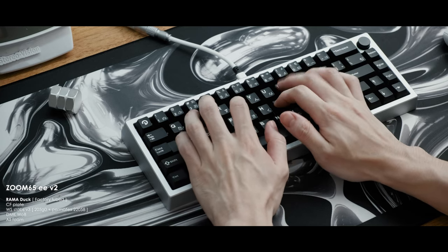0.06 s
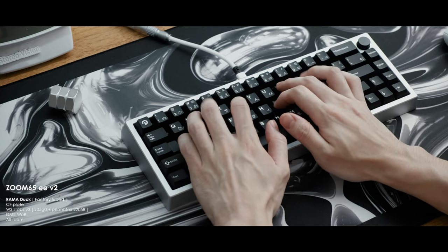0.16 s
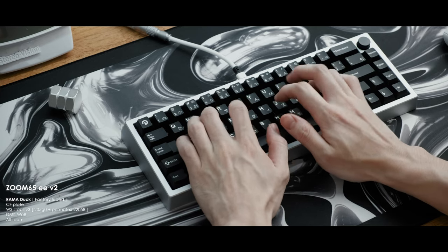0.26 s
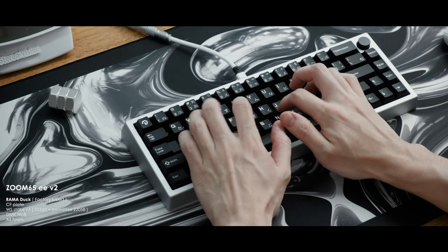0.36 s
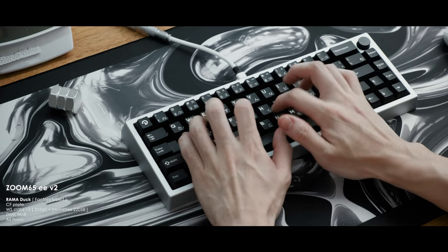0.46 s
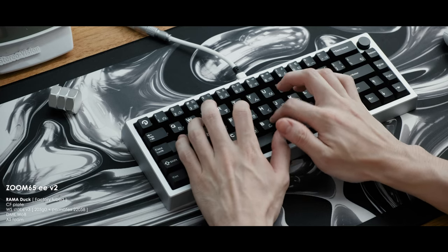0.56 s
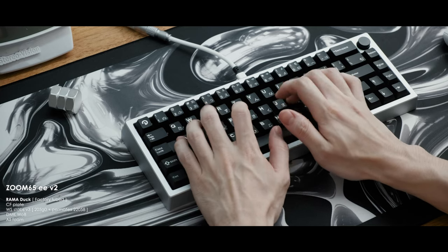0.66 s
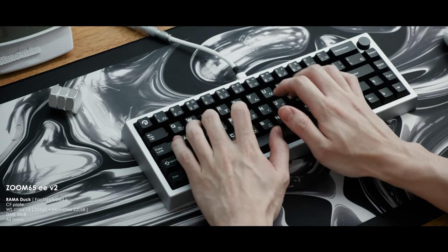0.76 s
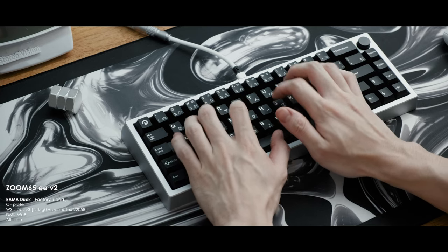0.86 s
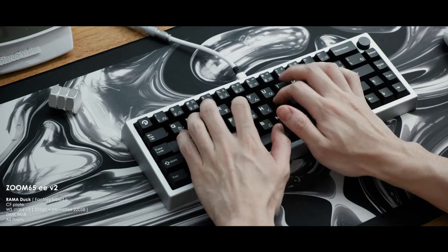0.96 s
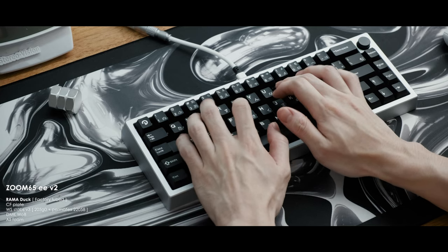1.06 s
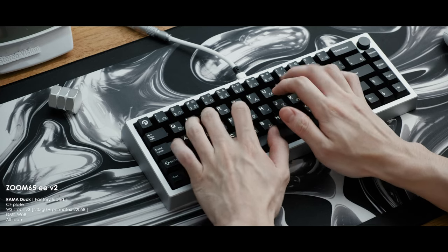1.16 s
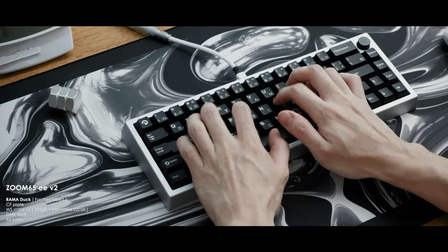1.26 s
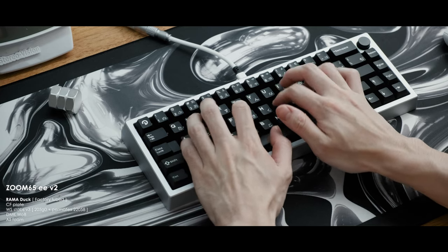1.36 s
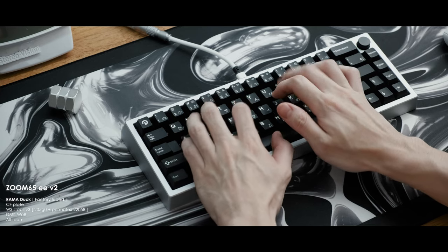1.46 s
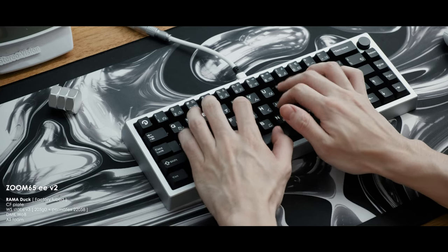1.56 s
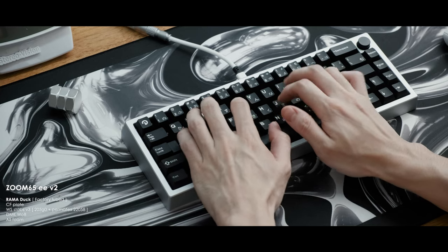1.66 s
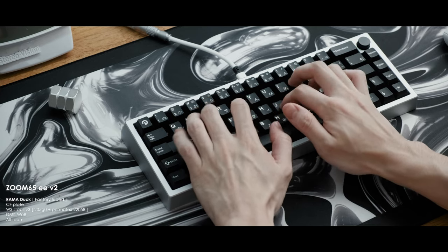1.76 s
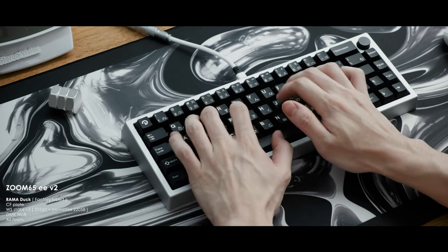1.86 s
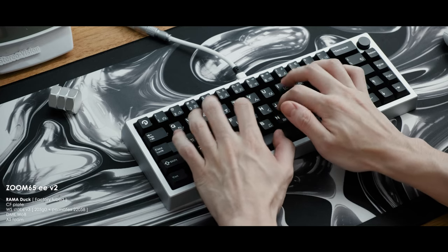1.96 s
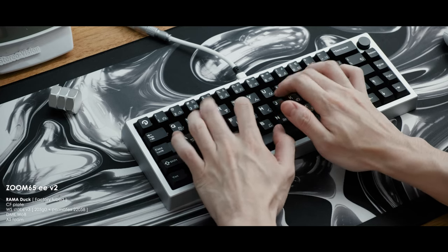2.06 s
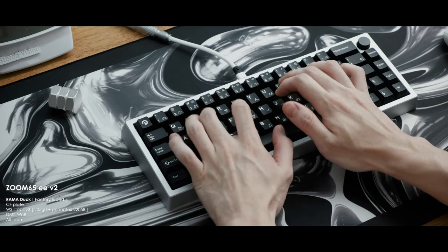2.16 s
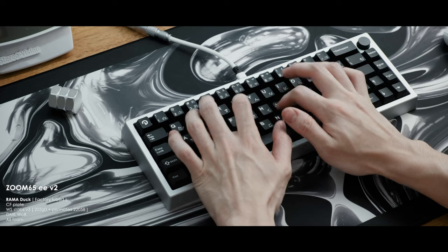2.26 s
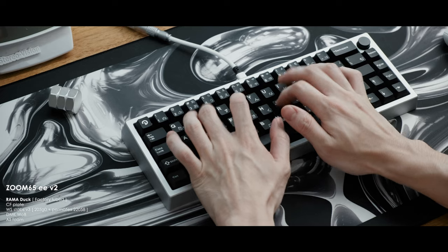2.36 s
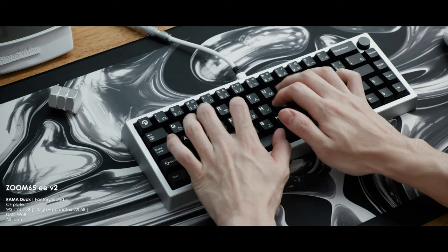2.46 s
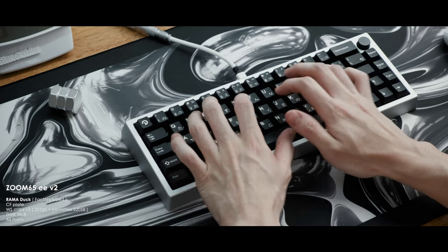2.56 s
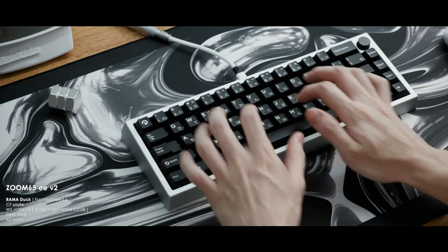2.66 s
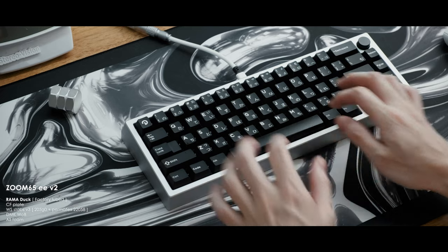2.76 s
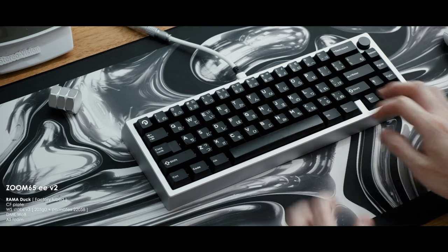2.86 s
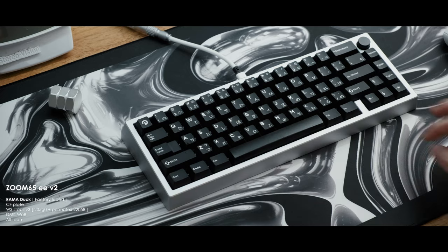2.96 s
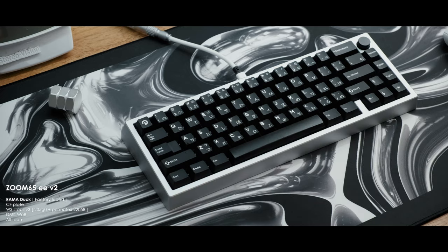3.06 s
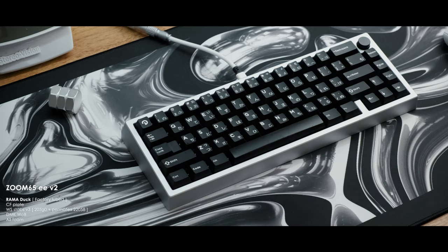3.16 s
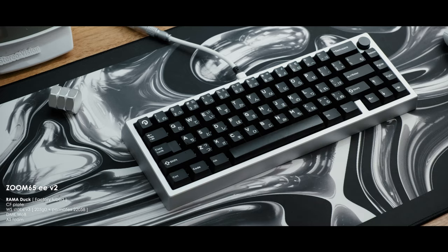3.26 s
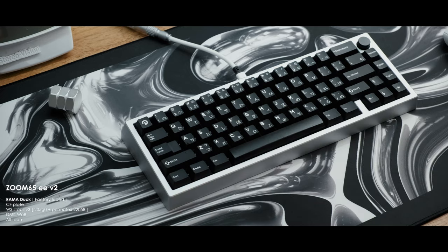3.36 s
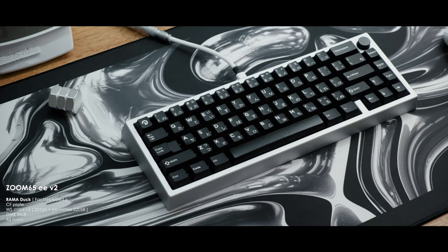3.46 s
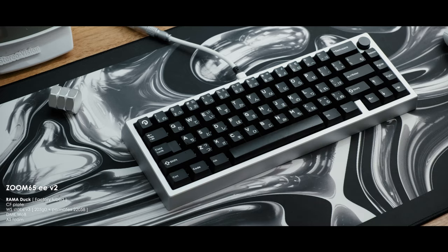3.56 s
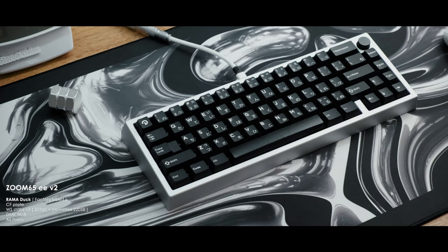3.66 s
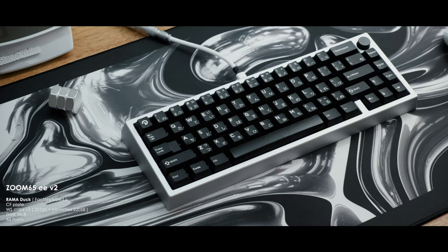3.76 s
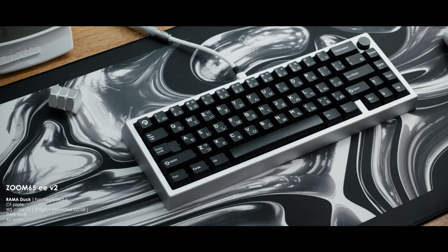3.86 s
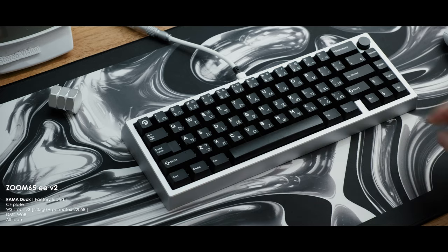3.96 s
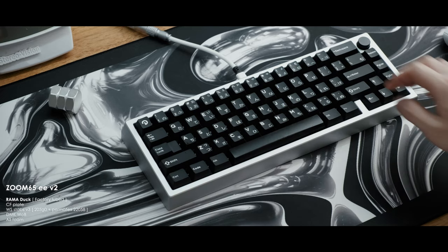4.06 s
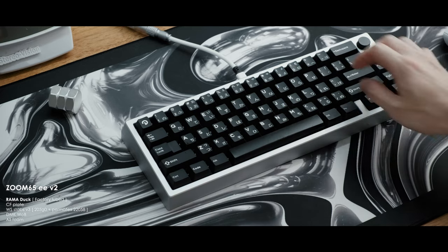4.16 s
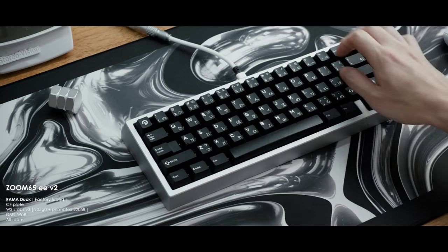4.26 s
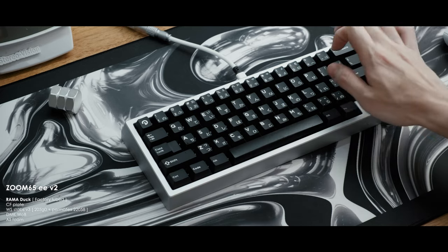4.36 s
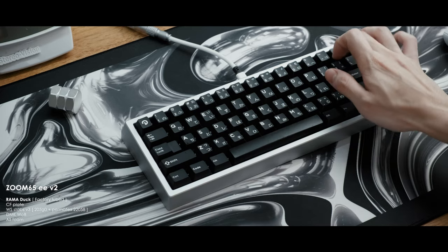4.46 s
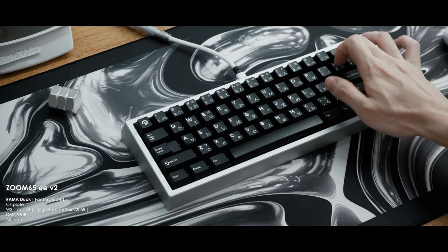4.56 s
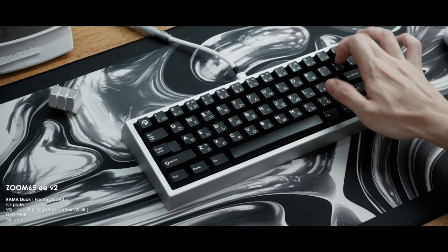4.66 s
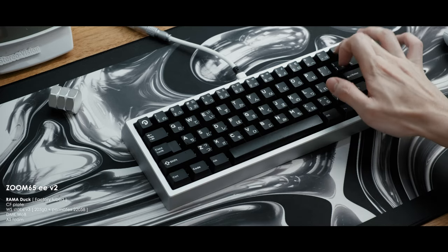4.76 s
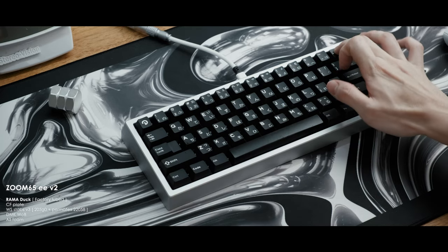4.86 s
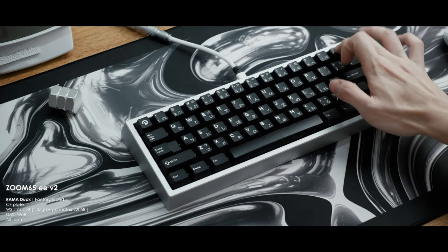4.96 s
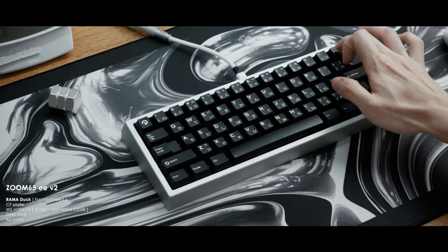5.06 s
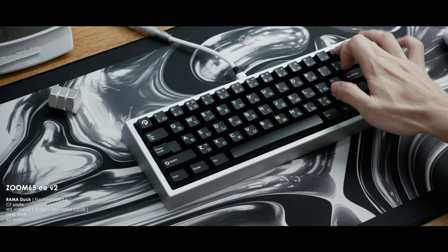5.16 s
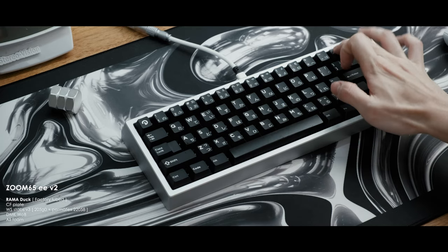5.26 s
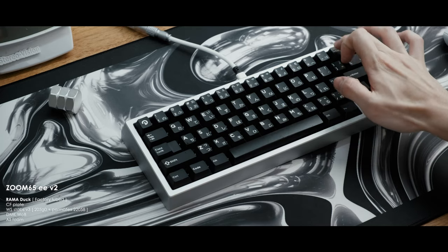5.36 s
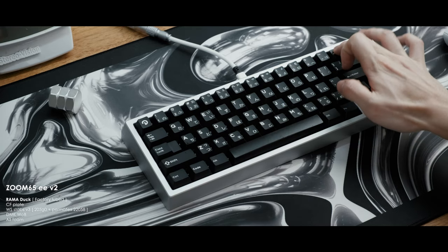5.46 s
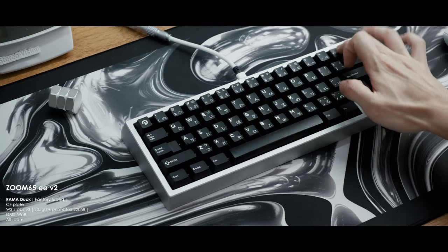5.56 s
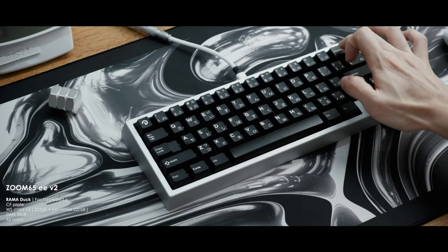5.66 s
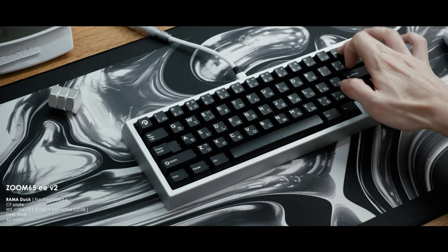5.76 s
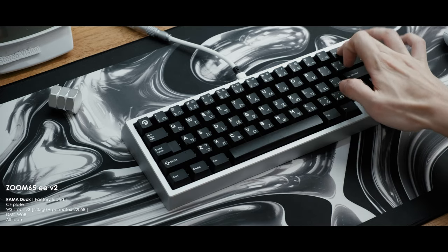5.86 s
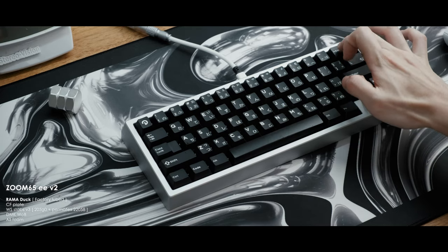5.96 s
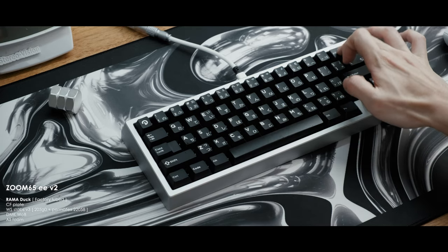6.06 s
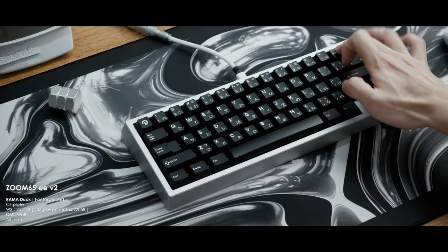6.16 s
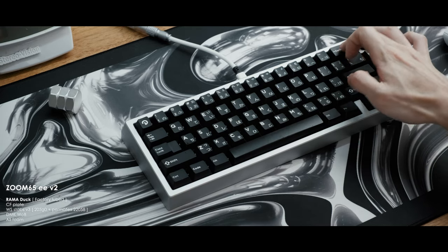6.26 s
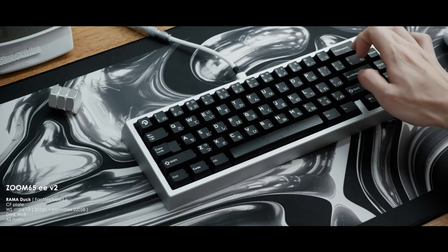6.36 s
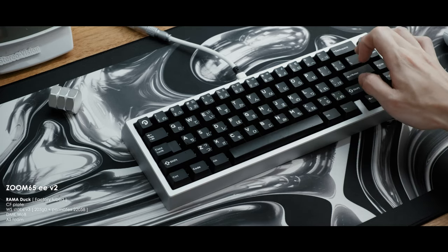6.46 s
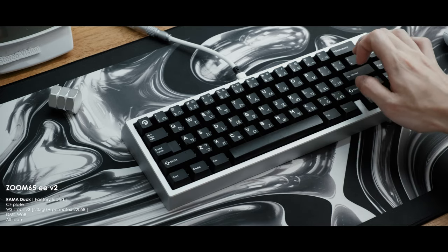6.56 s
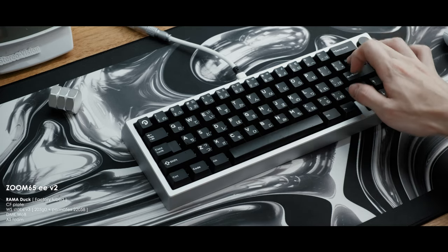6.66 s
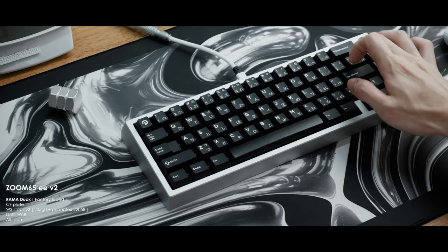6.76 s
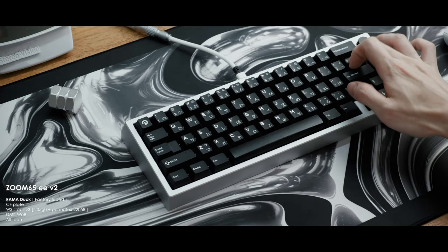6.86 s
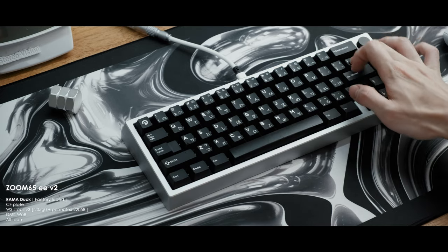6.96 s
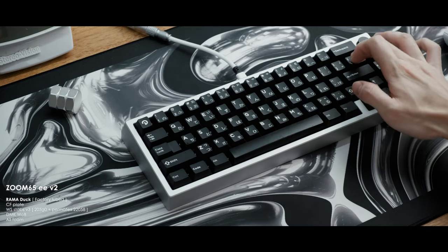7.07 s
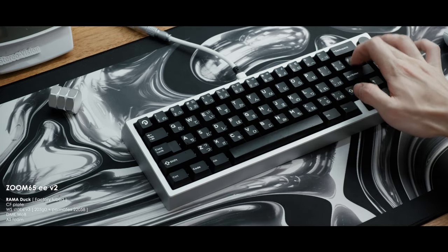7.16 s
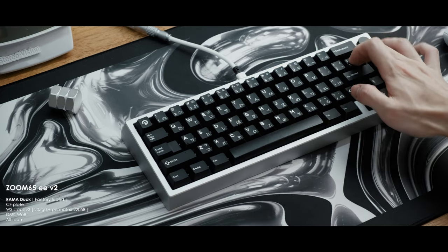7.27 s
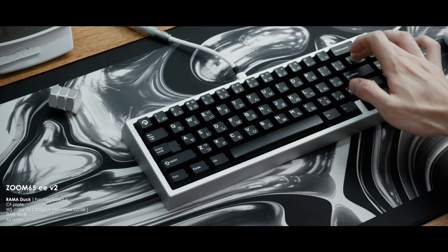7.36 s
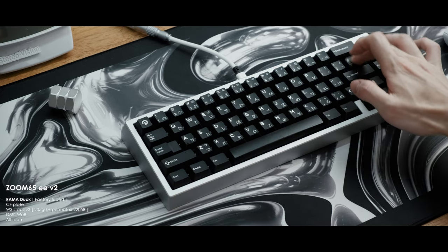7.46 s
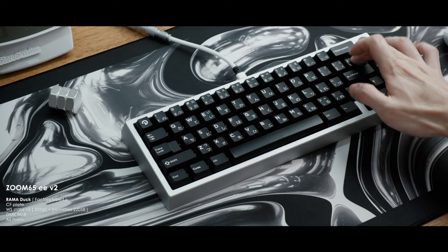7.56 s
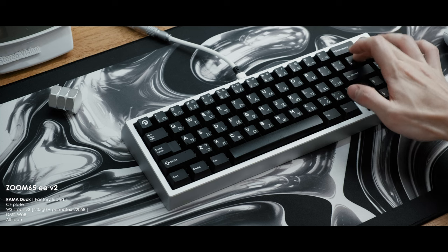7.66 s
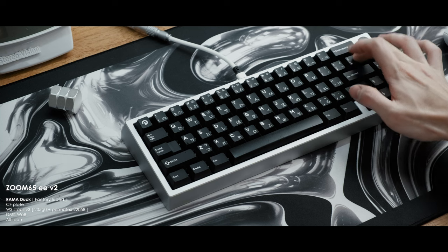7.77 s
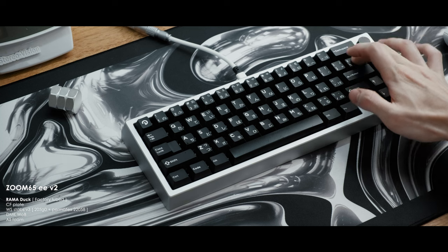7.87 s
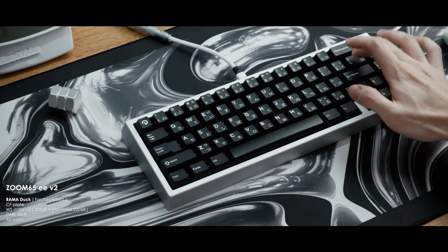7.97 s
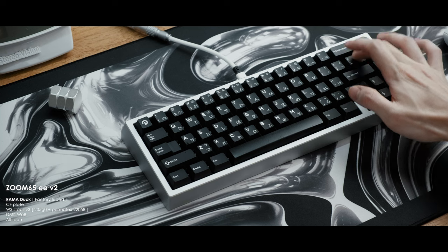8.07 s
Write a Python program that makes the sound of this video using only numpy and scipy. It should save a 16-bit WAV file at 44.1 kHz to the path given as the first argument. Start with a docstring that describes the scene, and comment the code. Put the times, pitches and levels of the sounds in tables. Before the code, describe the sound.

From the start, fast, uneven typing clacks on a heavy mechanical keyboard close to the microphone. Letter keys give short, rounded knocks and lighter release clicks, with space bar strokes at about 0.4, 0.8, 1.4 and 2.5 seconds. The typing stops near 2.6 seconds, leaving only the faint, steady hum of a computer fan.

At about 4.4 seconds a fingertip scuffs a keycap, and one wide key is tapped thirteen times, evenly, about seven per second, each press followed by a soft release. This ends near 6.3 seconds. From 6.7 seconds a second wide key is tapped ten times at the same pace, slightly louder and with a more pronounced return clack, until the end just after 8 seconds.

Very faint plastic scraping and spring ringing accompany the strokes, and a small room adds a short, soft tail.

```python
"""Fast typing on a heavy mechanical keyboard, close to the microphone. After a pause one hand taps
a wide upper key, then a wide lower key, each press followed by its release. Every knock rings the
same short plate and cap modes; fingertips scuff the caps, stems scrape in their housings and
switch springs sing faintly. A small room answers the keys over the hum of a computer fan."""
import sys
import numpy as np
from scipy import signal
from scipy.fft import rfft, irfft
from scipy.io import wavfile
from scipy.ndimage import uniform_filter1d

SR = 44100
rng = np.random.default_rng(int(sys.argv[2]) if len(sys.argv) > 2 else 0)


def put_to_file(sound):
    """Save the sound as 16-bit audio at rate SR, in the file named by the first command-line argument."""
    columns = np.atleast_2d(sound).T  # one column per channel
    safe = np.clip(columns, -1, 1)
    whole_steps = np.round(safe * 32767)
    wavfile.write(sys.argv[1], SR, whole_steps.astype(np.int16))


N = 358533
ONSET_DELAY_S = .0009  # every knock and touch starts this long after its listed time


def amp(db):
    return 10 ** (np.asarray(db) / 20)


def fade(t, t60_s):
    return np.exp(-np.log(1000) * t / t60_s)


def resonance(f, centre_hz, half_width_hz):
    return 1 / (1 + ((f - centre_hz) / half_width_hz) ** 2)


def butter(x, order, hz, kind="low"):
    return signal.sosfilt(signal.butter(order, hz, kind, fs=SR, output="sos"), x)


def noise(n, gain):
    """White noise shaped by gain(frequency in Hz)."""
    hz = np.arange(n // 2 + 1) * SR / n + 1
    return irfft(rfft(rng.standard_normal(n)) * gain(hz), n)


def add(track, sound, time_s):
    """Mix in a sound at its time."""
    i = int((time_s + ONSET_DELAY_S) * SR)
    track[..., i:i + sound.shape[-1]] += sound[..., :N - i]


# air noise spectrum: (frequency [Hz], relative density [dB])
FAN_AIR = [(15, -82.5), (25, -58), (105, -28.5), (120, -14.5), (161, -12.5), (175, -16), (195, -0.5),
           (229, -11), (384, -17), (463, -19), (1130, -26.5), (1230, -27.5), (5730, -52.5), (10700, -50.5),
           (16000, -55.5)]
# blade tones: (frequency [Hz], level [dB])
FAN_TONES = [(129.2, -73.5), (193.8, -70), (290.7, -81), (344.5, -90), (382.2, -76.5), (1141, -89)]


def fan(air_db=-66.5):
    """Blade tones that waver a little over soft air noise."""
    hz, db = np.transpose(FAN_AIR)
    air = noise(N, lambda f: amp(np.interp(np.log(f), np.log(hz), db)))
    out = amp(air_db) * air / air.std()
    for tone_hz, tone_db in FAN_TONES:
        waver = noise(N, lambda f: resonance(f, tone_hz, .025 * tone_hz))
        steady = np.sqrt(2) * np.sin(2 * np.pi * (tone_hz * np.arange(N) / SR + rng.random()))
        out += amp(tone_db) * (1.1 * steady + 0.78 * waver / waver.std())
    return out


# diffuse tail bands: (centre [Hz], t60 [s], level [dB])
ROOM_TAILS = [(209, 0.62, -26.5), (926, 0.54, -36), (2340, 0.31, -44), (4630, 0.39, -44),
              (10200, 0.15, -44)]
# desk, screen and wall echoes: (delay [s], level [dB])
ROOM_ECHOES = [(.0038, -16.5), (.0105, -24), (0.0155, -29)]


def room(dry):
    """A few near echoes, then a diffuse tail that loses its treble first."""
    t = np.arange(SR // 2) / SR
    response = np.zeros(len(t))
    for hz, t60_s, db in ROOM_TAILS:
        band = noise(len(t), lambda f: np.exp(-np.log2(f / hz) ** 2))
        response += amp(db) * band * fade(t, t60_s) * (1 - np.exp(-t / 0.0013))
    for delay_s, db in ROOM_ECHOES:
        response[int(delay_s * SR)] += amp(db)
    return signal.fftconvolve(dry, response)[:N]


def stem_slides(level_db=-85, half_width_s=.06, centre_hz=10400):
    """Stems scrape in their housings: a thin flickering hiss before and after each knock."""
    t, travel = np.arange(N) / SR, np.zeros(N)
    for table in [LETTER_PRESSES, LETTER_RELEASES] + WIDE_HITS:
        for time_s, *_ in table:
            start = max(int((time_s - 2 * half_width_s) * SR), 0)
            span = slice(start, int((time_s + 2 * half_width_s) * SR))
            swell = np.exp(-((t[span] - time_s) / half_width_s) ** 2)
            travel[span] = np.maximum(travel[span], swell)
    steps = np.repeat(rng.standard_normal(N // 256 + 1), 256)
    flicker = amp(3 * uniform_filter1d(steps, size=256)[:N])
    hiss = noise(N, lambda f: np.exp(-(np.log2(f / centre_hz) / 0.78) ** 2))
    return amp(level_db) * travel * flicker * hiss / hiss.std()


# fingertips landing on caps: (time [s], level [dB])
FINGER_TOUCHES = [(.362, -47.5), (.667, -55), (.719, -46.5), (0.827, -46), (1.44, -44), (1.505, -46.5),
                  (1.574, -51.5), (1.669, -48.5), (1.791, -43.5), (2.398, -50), (2.265, -47), (4.445, -34),
                  (4.569, -47.5)]


def finger_touches(brush_lead_s=0.0094, brush_db=-46, spring_hz=5280, spring_t60_s=0.12):
    """Skin and nail scuff the plastic and ring a spring, the upper key's far more than any other."""
    out, t = np.zeros(N), np.arange(6144) / SR
    brushes = []  # one ahead of each upper and lower press
    for press_s, press_db, _, _ in UPPER_STROKES + LOWER_STROKES:
        time_s = press_s - brush_lead_s + rng.normal(0, .002)
        brushes.append((time_s, press_db + brush_db + rng.normal(0, 5)))
    for time_s, db in FINGER_TOUCHES + brushes:
        on_upper_key = UPPER_STROKES[0][0] - 1 < time_s < UPPER_STROKES[-1][2]
        spring_db = -14.5 if on_upper_key else -30
        scuff = noise(len(t), lambda f: f / 1500 / (1 + (f / 1500) ** 2) / (1 + (f / 7000) ** 4))
        scuff *= fade(t, 0.025) * (1 - np.exp(-t / 0.00027))
        spring = noise(len(t), lambda f: resonance(f, spring_hz, 140))
        spring = amp(spring_db) * fade(t, spring_t60_s) * spring / spring.std()
        add(out, amp(db) * (scuff / abs(scuff).max() + spring), time_s)
    return out


# spring partials: (pitch ratio, level [dB])
SPRING_PARTIALS = [(.9, -3.5), (1, -1.5), (1.25, -8)]


def spring_ring(pitch_hz, half_width_hz=220, t60_s=0.41):
    """A wide key's coil spring sings on in narrow bands after the knock."""
    t = np.arange(6144) / SR
    ring = noise(len(t), lambda f: sum(amp(db) * resonance(f, ratio * pitch_hz, half_width_hz)
                                       for ratio, db in SPRING_PARTIALS))
    return fade(t, t60_s) * ring / ring.std()


# plate and cap modes: (frequency [Hz], t60 [s], letter [dB], upper press [dB], upper release [dB],
# lower press [dB], lower release [dB], space bar [dB])
BOARD_MODES = [(285, 0.03, -19, -15.5, -24.5, -18.5, -27, -22), (428, 0.094, -2, -1.5, -4, -1, -6, -6),
               (495, 0.069, -23, -1.5, -1.5, -0.5, -6, -5), (592, 0.063, -19.5, -8, -1, -10, -6.5, -7),
               (921.6, 0.045, 12, 11.5, 11.5, 11.5, 8.5, 2), (1184, 0.02, 26, 8.5, 20, 17, 12.5, 18.5),
               (1370, 0.026, -3.5, -7.5, -1.5, -56, -15, -5.5), (1745, 0.016, 2.5, 2.5, 0.5, -1, 12.5, 6),
               (1995, 0.013, 2, -4.5, -35, 4, 8.5, 0), (2233, 0.013, 4.5, -1, 2, 10.5, 8.5, 10),
               (2510, .014, 3.5, -17.5, -20.5, -11, -16, 2.5), (2774, 0.0091, 9, -4, -8.5, 4, 2, 8.5),
               (3065, 0.019, -5.5, -13.5, -14, -8, -9, -9.5),
               (3343, 0.015, -18, -23.5, -14.5, -11.5, -14, 2), (3670, .014, -14, -23, -27, -12, -8, -0.5),
               (4050, 0.0067, -29, -26.5, -26.5, -6, -15, -21.5),
               (5040, 0.01, -9, -24, -14.5, -12.5, -12, -22.5),
               (5424, 0.012, -8, -23.5, -22, -21, -16, -15.5),
               (5900, 0.0055, -32.5, -20, -86, -45, -6.5, -32),
               (7343, 0.018, -38.5, -12.5, -13.5, -35.5, -20, -22),
               (7800, 0.0068, -16.5, -3.5, -8.5, 11.5, -12, -2.5), (10100, .009, -8, -6, -15, -5, -20, -7),
               (10760, 0.0046, 13, 4.5, 11.5, -0.5, -20, 2), (13500, .008, -15, -11, 3, -22, -13.5, -14)]
MODE_HZ, MODE_T60_S, LETTER_MODE_DB, *WIDE_MODE_DB = np.transpose(BOARD_MODES)
THUD_TOP_HZ, FOAM_HZ, TICK_FOOT_HZ, CAP_FOOT_HZ = 1200, 4300, 6500, 740


def knock(mode_db, thud_db, tick_db, damping, snap, rattle_db, detune):
    """One blow rings low, middle and high modes with a crack of grit; rows: direct, room feed."""
    t = np.arange(3072) / SR
    pitch_hz = MODE_HZ * (1 + detune * rng.standard_normal(len(MODE_HZ)))
    contact = 1 - np.exp(-t / 0.00043)
    cap_decay = snap * fade(t, 0.0033)  # the cap radiates briefly, the plate rings on
    plate_decay = fade(t, MODE_T60_S[:, None] / damping)
    envelope = contact * (plate_decay + cap_decay)
    rings = -amp(mode_db)[:, None] * np.sin(2 * np.pi * pitch_hz[:, None] * t) * envelope
    thud = rings[MODE_HZ < THUD_TOP_HZ].sum(axis=0)
    clack = rings[(MODE_HZ > THUD_TOP_HZ) & (MODE_HZ < FOAM_HZ)].sum(axis=0)
    clack = butter(clack, 4, FOAM_HZ)  # foam under the plate dulls the edge
    clack += rings[(MODE_HZ > FOAM_HZ) & (MODE_HZ < TICK_FOOT_HZ)].sum(axis=0)
    clack = butter(clack, 2, CAP_FOOT_HZ, "high")  # a cap is too small to radiate lows
    tick = rings[MODE_HZ > TICK_FOOT_HZ].sum(axis=0)
    grit = np.diff(rng.standard_normal(len(t) + 1)) * fade(t, .008)
    tick = tick / abs(tick).max() + amp(-9) * grit
    blow = clack / abs(clack).max() + amp(thud_db) * thud / abs(thud).max() + amp(tick_db) * tick
    bounce_lag = int(SR * rng.uniform(.002, .005))  # the stem bounces or the cap rocks once
    blow[bounce_lag:] += amp(rattle_db) * blow[:-bounce_lag]
    # over all directions the modes blur, so the room gets a shorter, broader blow
    return np.array([blow, blow * fade(t, 0.0052)])


# letter keys bottoming out: (time [s], level [dB], plate pitch [Hz])
LETTER_PRESSES = [(0.112, -18, 2595), (0.247, -19.5, 2380), (0.283, -19, 3220), (0.347, -15, 2305),
                  (0.425, -29, 1769), (0.607, -16.5, 2070), (0.679, -19, 2860), (0.738, -22.5, 2760),
                  (0.785, -19.5, 2020), (0.866, -18.5, 2735), (0.925, -13.5, 2500), (0.999, -21, 1670),
                  (1.043, -19.5, 2550), (1.166, -16.5, 2359), (1.262, -15.5, 2130), (1.331, -19, 3100),
                  (1.509, -27, 1740), (1.683, -15, 2250), (1.795, -34, 1134), (1.815, -17, 2549),
                  (1.864, -16, 2790), (1.909, -14, 1830), (1.982, -16.5, 3130), (2.11, -26, 3000),
                  (2.125, -9, 2340), (2.225, -27, 2387), (2.274, -15.5, 2250), (2.372, -17, 2730),
                  (2.406, -9, 2340), (2.484, -24, 2900)]
# letter keys springing back: (time [s], level [dB], plate pitch [Hz])
LETTER_RELEASES = [(0.085, -27, 1100), (0.229, -25, 2740), (0.458, -21, 1670), (0.543, -38.5, 3050),
                   (0.576, -27.5, 1690), (0.627, -20.5, 1680), (0.916, -24, 2250), (0.947, -23, 1760),
                   (1.156, -21.5, 2000), (1.24, -19.5, 2000), (1.272, -24.5, 2000), (1.302, -34, 3000),
                   (1.325, -18.5, 1165), (1.385, -25.5, 2630), (1.418, -29, 1720), (1.528, -23, 2330),
                   (1.584, -34, 1010), (1.612, -24, 2264), (1.648, -27.5, 1270), (1.771, -35, 1680),
                   (1.933, -21.5, 2720), (1.97, -22.5, 1050), (2.018, -22.5, 1164), (2.053, -20, 2750),
                   (2.176, -24.5, 2490), (2.443, -25.5, 2350), (2.513, -22.5, 2350), (2.577, -29.5, 1104)]


def letter_keys(mode_scatter_db=3, tick_scatter_db=3.5):
    """Each key sits on its own part of the plate and favours the modes near that pitch."""
    out = np.zeros((2, N))
    for table, thud_db, mean_tick_db in [(LETTER_PRESSES, -18, -21), (LETTER_RELEASES, -7.5, -19)]:
        for time_s, db, plate_hz in table:
            boost_db = 11 * np.exp(-(np.log(MODE_HZ / plate_hz) / 0.18) ** 2)
            mode_db = rng.normal(LETTER_MODE_DB + boost_db, mode_scatter_db)
            tick_db = rng.normal(mean_tick_db, tick_scatter_db)
            blow = knock(mode_db, thud_db, tick_db, damping=1.29, snap=1.5, rattle_db=-22, detune=.03)
            add(out, amp(db) * blow, time_s)
    return out


# wide upper and lower key strokes: (press time [s], level [dB], release time [s], level [dB])
UPPER_STROKES = [(4.456, -19.5, 4.509, -34.5), (4.586, -20, 4.65, -26.5), (4.725, -15.5, 4.797, -31),
                 (4.866, -14.5, 4.944, -31.5), (5.012, -14, 5.085, -28), (5.161, -13.5, 5.233, -28.5),
                 (5.306, -13, 5.377, -28.5), (5.453, -13, 5.523, -26), (5.604, -12, 5.674, -26.5),
                 (5.75, -13.5, 5.821, -29.5), (5.898, -17.5, 5.969, -30), (6.041, -17, 6.115, -27.5),
                 (6.197, -11.5, 6.281, -33)]
LOWER_STROKES = [(6.687, -12.5, 6.764, -18), (6.854, -15.5, 6.917, -21), (6.988, -14, 7.059, -20.5),
                 (7.137, -13.5, 7.21, -14), (7.289, -11.5, 7.359, -19), (7.436, -11, 7.51, -17),
                 (7.593, -11, 7.658, -21), (7.727, -11.5, 7.8, -16), (7.879, -11.5, 7.942, -14.5),
                 (8.032, -9.5, 8.095, -15.5)]
# space bar knocks: (time [s], level [dB])
SPACE_HITS = [(0.368, -15), (0.8339, -11.5), (1.447, -13), (2.479, -15)]
# upper press, upper release, lower press, lower release, space bar: each (time [s], level [dB])
WIDE_HITS = [*np.hsplit(np.array(UPPER_STROKES), 2), *np.hsplit(np.array(LOWER_STROKES), 2), SPACE_HITS]
# timbres, same order: (thud [dB], tick [dB], damping, snap, rattle [dB], spring [Hz], spring [dB])
WIDE_TIMBRES = [(-16.5, -24.5, 1.27, 0.076, -19.5, 5280, -62), (-2.5, -24.5, 2.02, 0.91, -14.5, 4400, -60),
                (-20, -23.5, 1.24, 1, -27, 7700, -63.5), (-15, -19.5, 1.21, 1, -15, 7700, -63),
                (-12.5, -20, 0.83, 0.44, -20.5, 3900, -58)]


def wide_keys(mode_scatter_db=2.2):
    """A cap struck over and over rings nearly alike each time, and its spring sings faintly."""
    out = np.zeros((2, N))
    for hits, mean_mode_db, timbre in zip(WIDE_HITS, WIDE_MODE_DB, WIDE_TIMBRES):
        thud_db, tick_db, damping, snap, rattle_db, spring_hz, spring_db = timbre
        for time_s, db in hits:
            mode_db = rng.normal(mean_mode_db, mode_scatter_db)
            blow = knock(mode_db, thud_db, tick_db, damping, snap, rattle_db, detune=.01)
            add(out, amp(db) * blow, time_s)
            add(out[0], amp(db + spring_db) * spring_ring(spring_hz), time_s)
    # at the start, the tail of a space bar stroke still hangs in the room
    _, room_feed = knock(mean_mode_db, thud_db, -18.5, damping, snap, rattle_db, detune=0)
    add(out[1], amp(-12) * room_feed, -ONSET_DELAY_S)
    return out


def scene():
    """Keys and fingers, direct and through the room, over stem hiss and the fan."""
    keys = butter(letter_keys() + wide_keys(), 3, 129, "high")  # board too small for deep bass
    direct, room_feed = keys + finger_touches()
    return (direct + room(room_feed) + stem_slides() + fan())[None]


def record(dry):
    """The microphone droops at the top; the recorder cuts above that."""
    droop_hz, cutoff_hz = 13600, 16200
    mic = butter(dry, 5, droop_hz)
    return signal.sosfilt(signal.ellip(8, .2, 70, cutoff_hz, fs=SR, output="sos"), mic)


dry = scene()
out = record(dry)
put_to_file(out)
```